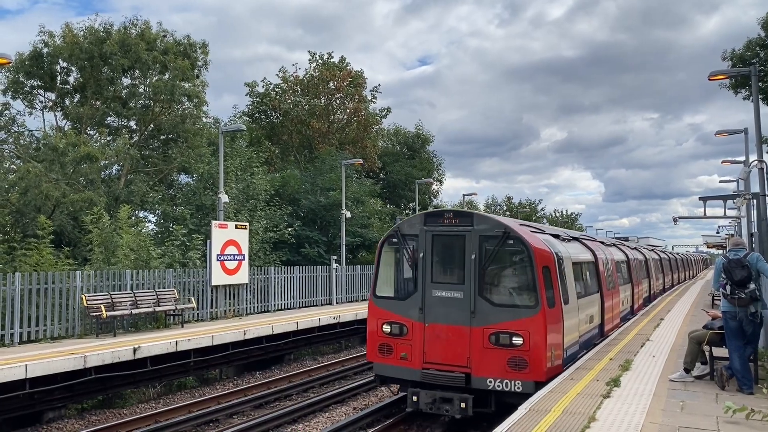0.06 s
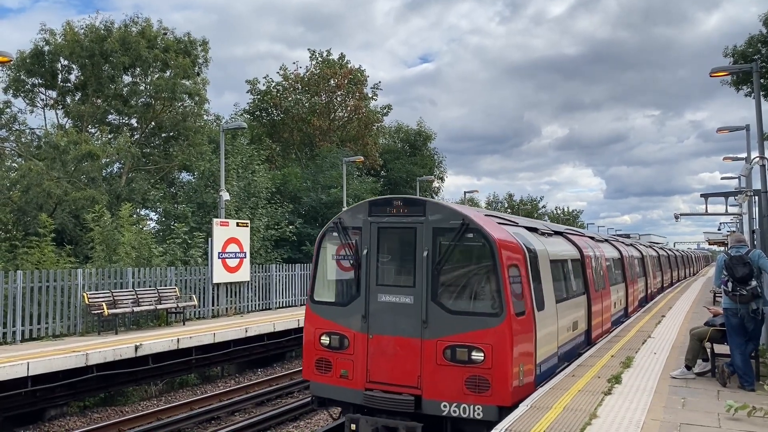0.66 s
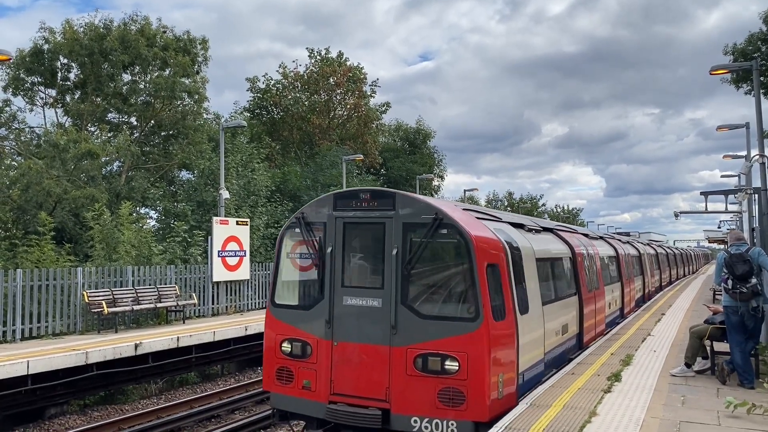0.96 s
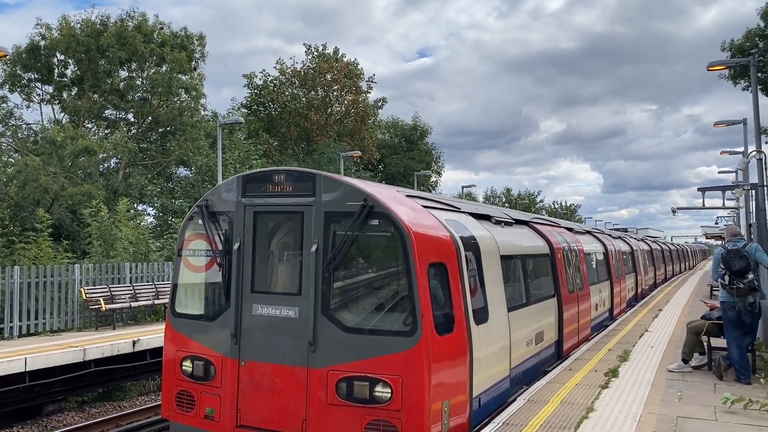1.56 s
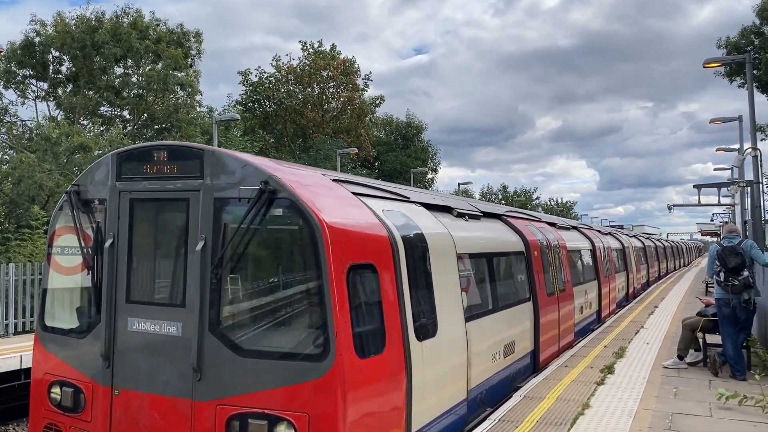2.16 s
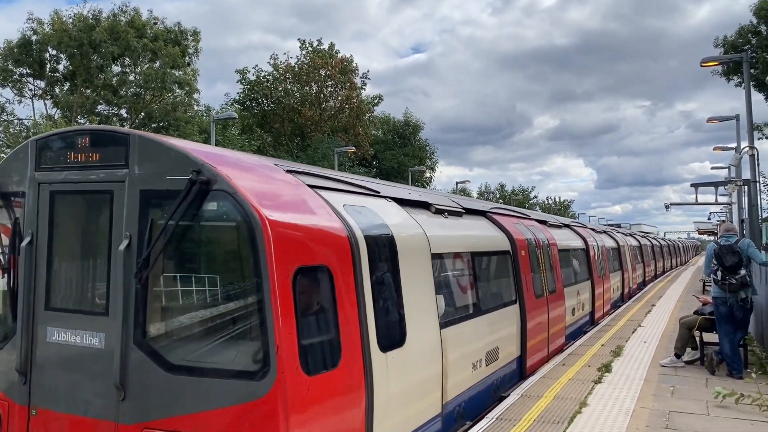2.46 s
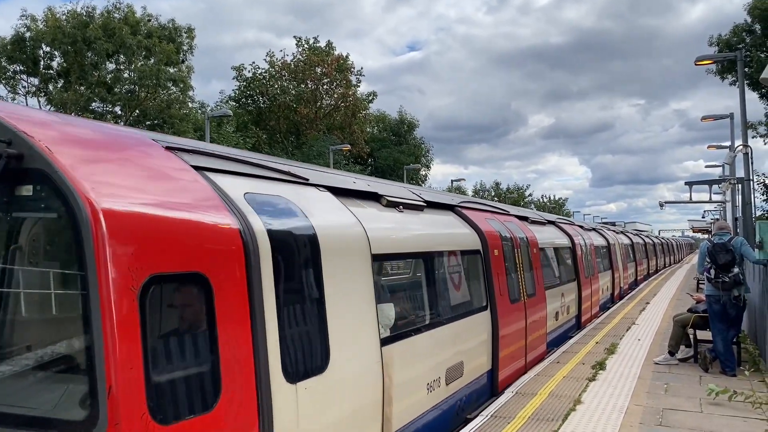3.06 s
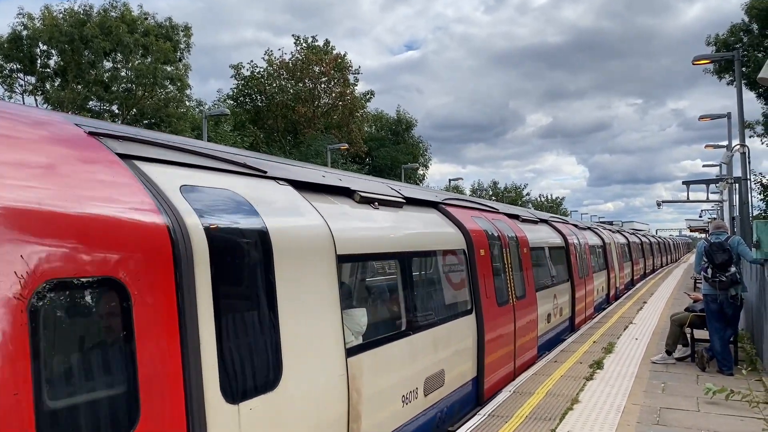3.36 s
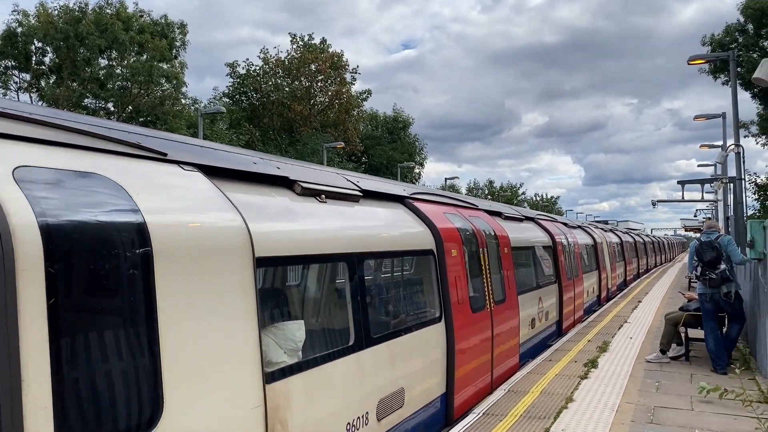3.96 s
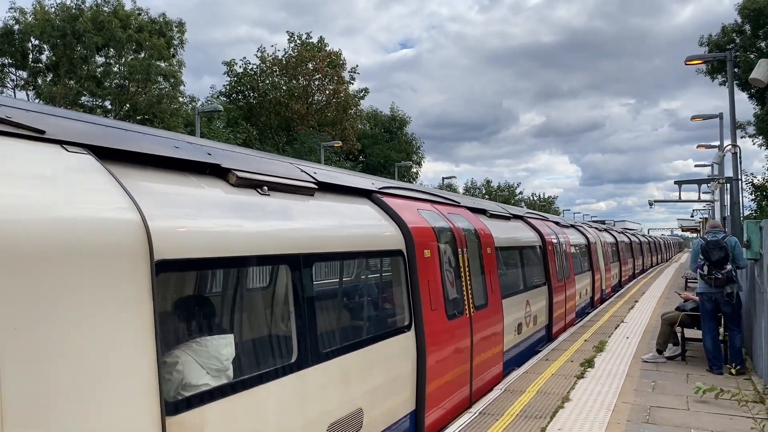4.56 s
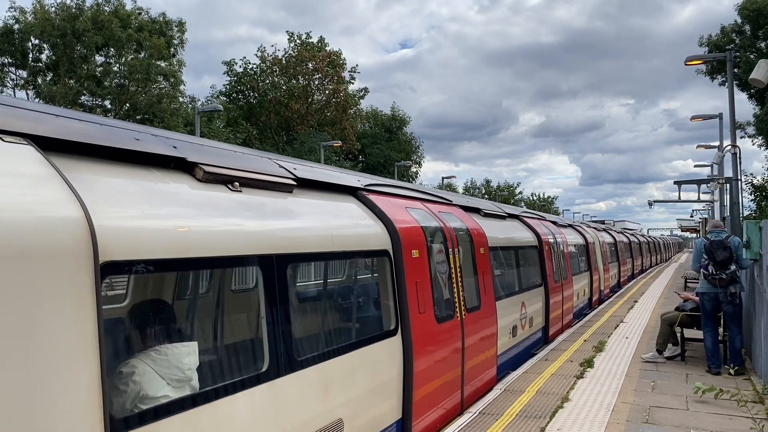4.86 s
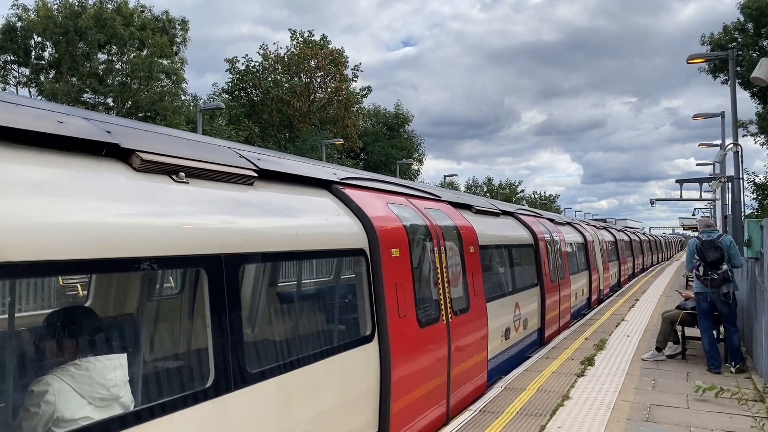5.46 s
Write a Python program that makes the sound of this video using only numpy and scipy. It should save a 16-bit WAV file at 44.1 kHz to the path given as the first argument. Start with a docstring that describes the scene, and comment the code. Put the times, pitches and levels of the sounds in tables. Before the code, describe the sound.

High, ringing brake squeals and a low rumble come from a slowing electric train, after a brief sinking motor whine.

```python
"""A falling whine over a low rumble: an electric train brakes to a stop beside an open platform.
The drive sings at multiples of its rotation rate, so its pitch sinks with the speed until it cuts out
after a second. The friction brakes take over, and stick-slip sets wheel after wheel squealing, each in
one of its modes; two loud notes from the nearest wheel come just before the stop. Underneath, the cars
rumble and knock over the rails, and their on-board equipment hums."""
import sys
import numpy as np
from scipy import signal
from scipy.fft import rfft, irfft, next_fast_len
from scipy.io import wavfile
from scipy.ndimage import uniform_filter1d, map_coordinates

SR = 44100
rng = np.random.default_rng(int(sys.argv[2]) if len(sys.argv) > 2 else 0)


def to_wav(sig):
    """Store sig (one row per channel, or 1-D mono) as 16-bit WAV at the path in sys.argv[1].

    Samples outside -1..1 are clipped; the rate is SR.
    """
    pcm = np.clip(np.atleast_2d(sig), -1, 1) * 32767
    pcm = np.round(pcm).astype(np.int16)
    wavfile.write(sys.argv[1], SR, pcm.T)  # frames by channels


N = 246959

# Noise spectra. Each row: frequency in Hz, relative spectral density in dB.
DRIVE_SPECTRUM = [(150, -14), (350, 3), (520, -12.5), (680, -2), (950, -6.5), (1550, -8.5), (2000, -6),
                  (2250, -15), (2750, -2), (3600, -15.5), (5000, -15.5), (8000, -29), (15000, -59)]
RUMBLE_SPECTRUM = [(20, -23), (35, -6), (52, 5), (85, 6), (110, 2), (135, -4), (220, -57)]
BODY_SPECTRUM = [(90, -40), (140, 2), (200, -0.5), (330, -2), (430, -4.5), (540, -20), (900, -63)]
HISS_SPECTRUM = [(300, -7.5), (520, -1.5), (900, -0.5), (1400, -7.5), (2200, -10), (3200, -7),
                 (4300, -13.5), (6500, -16), (8500, -29.5), (11500, -26.5), (13500, -26), (15000, -41)]
GRIND_SPECTRUM = [(3500, -13.5), (5000, 13.5), (6300, -14), (7400, -4), (9000, -24), (10400, 0),
                  (11500, 11.5), (12200, -12), (13100, 8.5), (14300, 6), (15500, -5)]
# Noise envelopes. Each row: time in seconds, level in dB.
DRIVE_ENVELOPE = [(0, -45.5), (.18, -43.5), (.35, -37.5), (.55, -40.5), (1.01, -43)]
RUMBLE_ENVELOPE = [(0, -44.5), (.9, -41.5), (1.25, -47), (1.6, -43.5), (2.1, -41), (2.7, -45.5),
                   (3.6, -43.5), (4.2, -43.5), (4.65, -40.5), (5.6, -44.5)]
GRIND_ENVELOPE = [(.15, -68), (.35, -53.5), (1.5, -49.5), (2.5, -55), (3, -71), (4.6, -73), (4.8, -62),
                  (5.6, -54)]
# Rolling noise. Each row: time in seconds, car body level in dB, hiss level in dB.
ROLLING_ENVELOPES = [(0, -42.5, -48), (1.1, -47, -48.5), (1.6, -46.5, -48.5), (2.2, -45, -48),
                     (2.7, -46, -49), (3.3, -47.5, -49.5), (4.2, -45.5, -51), (4.9, -46.5, -51),
                     (5.2, -49, -53), (5.6, -48, -50.5)]
# Likeness of the noise at left and right. Each row: frequency in Hz, correlation.
COHERENCE = [(60, .84), (250, .78), (600, .4), (1200, .25), (2200, .45), (5000, .3)]
# The drive's strong orders. Each row: multiple of the fundamental, level in dB.
STRONG_ORDERS = [(3, -48.5), (4, -50.5), (7, -46), (10, -57.5), (11, -56), (14, -53)]
# Its weak orders. Each row: multiple of the fundamental, level in dB relative to DRIVE_ENVELOPE.
WEAK_ORDERS = [(6, -16), (9, -23), (17, -17), (21, -13.5), (25.3, -11.5), (27.4, -10.5), (28.7, -7.5)]
# Housing resonances that lift or sink a passing order. Each row: centre in Hz, half width in Hz, lift in dB.
HOUSING_RESONANCES = [(269, 2.5, 7), (281, 6, 5), (293, 3, 7), (302, 6.5, 12), (315.5, 2.8, 16),
                      (382, 11, 12), (634, 15, 15), (655, 7, 9), (672, 5, -6), (698, 11, 4.5),
                      (902, 17, 13), (1019, 19, 8.5), (1255, 20, 7), (1361, 21, 10), (1424, 17, 12)]
# Passing equipment. Each row: pitch in Hz, peak level in dB, time when nearest in seconds,
# half passing time in seconds.
EQUIPMENT_HUMS = [(339, -57.5, 4.8, 1.1), (770, -64, 4.3, 1.1), (903, -59, 2.3, 1), (1100, -65, 4.7, .96),
                  (1207, -57.8, 4.55, .9)]
# Squeals of rolling wheels, a far car and near wheels at a crawl. Each row: start, rise, hold and fall
# in seconds, pitch and bend in Hz, level and its drift in dB, diffuse share of the power,
# left over right in dB, relative level of the octave in dB, Doppler spread in Hz.
ROLLING_WHEELS = [ (.1, .26, .08, .39, 5302, 218.5, -23.5, 0.5, 0.5, 6.5, -18, 40),
                  (0.055, 0.12, .5, .15, 6625, 81, -43, 5, 0.62, 0.5, -16, 55),
                  (.24, .12, .06, .45, 6275, 106, -35.5, -1.5, 0.73, 2, -13, 50),
                  (.48, 0.067, 0.03, .1, 5870, 0, -37.5, 2, .65, 5, -23, 39),
                  (.7, .07, 1.69, .1, 5627, -8, -26.8, -.5, .33, 4, -16, 42),
                  (1.4, .05, .08, .08, 5612, 0, -26, 0, .2, 4, -22, 30),
                  (2.46, .07, .16, .05, 5618, 0, -27, 1, .25, 4, -21, 30),
                  (2.738, .012, .03, .3, 5615, 60, -27.5, 0, .25, 4, -20, 30),
                  (.7, .08, .47, .42, 5845, -49.5, -29.3, -1, .72, 4, -16, 55),
                  (1.5, .07, 0.027, .17, 5680, 142, -26.5, -4, 0.6, 1, -32, 33),
                  (1.72, .08, 0.49, .25, 5836, -17, -34, 6, 0.75, 9, -32, 23),
                  (2.92, .08, .03, .33, 5745, 60, -43, -10, .5, 8, -30, 40),
                  (.72, .11, 1.85, .27, 6700, 8, -30.5, 0.5, 0.48, 0.5, -16.5, 50),
                  (1.66, .06, .03, .09, 6700, 0, -25.5, 0, .15, 1, -26, 25),
                  (0.83, 0.12, .7, 0.23, 7130, 40, -47, -2, 0.8, -2, -5, 60),
                  (1.05, 0.26, 1, .5, 7250, -88, -49.5, -2, .7, -2, 2, 76),
                  (.74, .06, .15, .4, 5005, 0, -46, 0, .6, 4, -22, 45),
                  (1.33, .1, 0.17, 0.3, 4590, 90, -39.5, 0, 0.63, 4.5, -26, 44),
                  (2.05, .12, .65, .3, 4644, 0, -43.5, 1, .75, 4, -28, 37),
                  (1.33, .2, .02, 0.19, 10200, 80, -48.5, 1, 0.86, 2, -30, 47),
                  (.25, .08, 2.1, .35, 12540, -250, -48.5, -5, .9, 0, -30, 90)]
FAR_WHEELS = [ (.75, 0.2, 0.54, 0.79, 6900, -3, -42, -6, 0.51, -1, -20, 65),
              (2.2, 0.24, 0.27, 0.28, 7000, 2, -51, -4, .6, -1, -20, 55),
              (2.65, 0.26, 0.35, .18, 6840, 152.5, -46.5, 3, 0.61, -1, -15, 54.5),
              (3.3, .15, .3, .15, 6820, 100.5, -44, 1, 0.71, -.83, -15.5, 55.5),
              (3.7, .15, .55, .2, 6870, 50.5, -42.5, -3.2, 0.59, -1, -16.5, 55.1),
              (4.351, 0.22, 0.4, .75, 6980, 40, -45, -5, 0.58, -0.8, -12, 55.7)]
CRAWLING_WHEELS = [ (5.37, .11, .18, .1, 5824, 1, -27.5, 2, .1, 10, -21, 16),
                   (5.38, .06, .2, .1, 5588, -20, -34, -4, .2, 6.6, -22, 16)]
# Jolts of the running gear. Each row: start in seconds, level in dB, centre in Hz, 60 dB decay in seconds.
GEAR_JOLTS = [(.6, -32.5, 77.5, 0.43), (.82, -30, 85, 0.4), (1.552, -39.5, 320, 0.29),
              (1.63, -30, 58, 0.17), (2.03, -28.5, 66.5, 0.17), (2.621, -35, 756, 0.099),
              (3.9, -36, 85, 0.24), (4.098, -39.5, 302, 0.22), (4.14, -36.5, 404, 0.13),
              (4.23, -35, 80, 0.27), (5.03, -30.5, 82, .25)]
# Flares of a biting overtone. Each row: peak time in seconds, half length in seconds, level in dB.
OVERTONE_FLARES = [(.86, .08, -51), (1.16, .09, -46), (1.38, .07, -47), (1.47, .04, -47), (1.58, .05, -52),
                   (1.77, .1, -53), (1.94, .05, -55), (2.175, .08, -40), (2.27, .05, -45), (2.43, .12, -52)]
# Single brake blocks. Each row: peak time, rise and fall in seconds, pitch and bend in Hz, level in dB.
BLOCK_SQUEAKS = [ (1.17, 0.091, 0.1, 2810, -2, -51.5), (1.41, 0.14, 0.18, 2787, 56, -45.5),
                 (1.56, 0.096, .18, 4606, -5, -26.5), (1.789, 0.1, 0.19, 2794, -46, -39.5),
                 (1.869, 0.1, 0.25, 4550, -37, -42.5), (2.42, 0.097, 0.16, 2820, 0, -49.5),
                 (2.58, 0.11, 0.1, 4870, 0, -44), (2.58, 0.084, 0.18, 5030, 0, -45),
                 (2.8, 0.12, 0.19, 5040, 0, -46), (2.9, 0.19, 0.25, 3330, -62, -47),
                 (3.05, 0.36, 0.28, 3144, -2, -49), (3.18, .08, .12, 3105, 0, -40),
                 (3.255, .02, 0.16, 3094, 0, -45), (3.33, 0.039, 0.14, 3140, 0, -48),
                 (3.015, 0.052, 0.29, 4100, 2, -40.5), (3.1, .025, .09, 4084, -2, -31.5),
                 (3.15, 0.029, .15, 4090, 2, -33), (3.32, .08, 0.14, 4140, 70, -49),
                 (3.745, 0.047, .12, 3460, 0, -43), (3.795, 0.0303, .07, 3440, 0, -35.5),
                 (3.835, .025, .06, 3440, 0, -44), (3.89, .05, .22, 3440, 0, -55),
                 (4.695, .035, 0.18, 4540, 0, -33), (4.95, 0.087, .15, 2990, 5, -47),
                 (5.029, 0.22, 0.48, 6730, 31, -52), (5.13, 0.15, 0.37, 7220, 2, -51),
                 (5.15, 0.23, 0.69, 3210, 0, -58.5), (5.275, 0.057, .14, 4590, 8, -29),
                 (5.6, 0.22, 0.088, 7150, 2, -47.5)]
# The nearest wheel's two notes. Each row: time in seconds, pitch in Hz, level in dB.
UPPER_MODE = [(4.6, 5860, -71), (4.66, 5660, -36), (4.73, 5610, -32), (4.77, 5635, -39.5),
              (4.81, 5640, -22), (4.89, 5612, -25), (4.975, 5616, -23.5), (5.03, 5614, -26),
              (5.14, 5614, -24), (5.26, 5614, -25.5), (5.34, 5646, -22.5), (5.4, 5690, -25.5),
              (5.47, 5790, -40), (5.52, 5720, -80)]
LOWER_MODE = [(4.65, 4530, -73), (4.7, 4450, -34), (4.8, 4435, -24.5), (4.87, 4452, -27.5),
              (4.96, 4473, -24.7), (5.07, 4480, -24), (5.18, 4510, -26), (5.24, 4557, -27.5),
              (5.33, 4604, -38), (5.47, 4600, -70)]
# Three swells an octave under the lower note. Each row: time in seconds, level in dB.
SUBHARMONIC = [(4.82, -75), (4.875, -43), (4.905, -39.5), (4.945, -51), (4.99, -45), (5.08, -50),
               (5.14, -38.5), (5.2, -45), (5.25, -57), (5.35, -70)]
# Phase between the stereo channels. Each row: frequency in Hz, lead of the left side in radians.
LEFT_LEAD = [(1500, 0), (3000, .5), (4470, 1.7), (5600, 3.9), (5850, 4), (6250, 6.2), (7600, 6.3),
             (8500, 9.3), (9400, 9.5), (10000, 12.5), (11900, 12.5), (12800, 15.6), (16000, 15.7)]

TOP_HZ = 15750  # band limit
TIME = np.arange(N) / SR


def amp(db):
    """Amplitude ratio of a level in decibels."""
    return 10 ** (np.asarray(db) / 20)


def unit(x):
    """The signal normalised to rms 1."""
    return x / np.sqrt(np.mean(np.abs(x) ** 2) + 1e-20)


def along(points, hz):
    """Interpolation of (Hz, value) points on a logarithmic frequency axis."""
    freqs, values = np.transpose(points)
    return np.interp(np.log(hz + 1), np.log(freqs + 1), values)


def curves(rows):
    """Linear interpolation in time: one value per sample for each column after the first."""
    times, *columns = np.transpose(rows)
    return [np.interp(TIME, times, column) for column in columns]


def wobble(rate, size=N):
    """Smooth random modulation with rate knots a second."""
    knots = rng.standard_normal(int(size * rate / SR) + 4)
    return map_coordinates(knots, [np.arange(size) * rate / SR])


def filtered(x, response):
    """Linear filtering: the spectrum is multiplied by a frequency response."""
    size = next_fast_len(N + 8192)
    return irfft(rfft(x, size) * response(np.fft.rfftfreq(size, 1 / SR)), size)[..., :N]


def rush(spectrum, patchy_db):
    """Partially coherent stereo noise, its gain varying in random patches of time and frequency."""
    bins = signal.stft(rng.standard_normal((2, N)), nperseg=512)[2]
    patches = uniform_filter1d(rng.standard_normal(bins.shape[1:]), size=5, axis=0)
    patches = uniform_filter1d(patches, size=14, axis=1)
    pair = signal.istft(bins * amp(patchy_db * unit(patches)), nperseg=512)[1][:, :N]
    angle = lambda hz: np.arccos(np.clip(along(COHERENCE, hz), -1, 1)) / 2
    mid, side = filtered(pair, lambda f: amp(along(spectrum, f)) * [np.cos(angle(f)), np.sin(angle(f))])
    return np.array([mid + side, mid - side]) / np.std(mid)


def scatter(width_hz, size, step=8):
    """Multipath fading: many Doppler-shifted reflections sum to one complex gain per ear."""
    count = next_fast_len(size // step + 512)
    shift_hz = np.fft.fftfreq(count, step / SR)
    reflections = rng.standard_normal((2, count)) + 1j * rng.standard_normal((2, count))
    fading = np.fft.ifft(reflections * np.exp(-np.abs(shift_hz) / width_hz))
    return np.array([np.interp(np.arange(size) / step, np.arange(count), unit(ear)) for ear in fading])


def tone(hz, width_hz, wet, echo=0):
    """Superposition of a direct tone, one wall echo and diffuse reflections; wet and echo share power."""
    # the echo path shortens more slowly than the direct one, so it arrives a little flat and beats
    lag_cycles = np.cumsum(width_hz * (1 + 0.2434 * wobble(9, len(hz)))) / SR
    wall = np.exp(-2j * np.pi * (lag_cycles + rng.random()))
    steady = np.sqrt(1 - echo) + np.sqrt(echo) * wall
    paths = np.sqrt(1 - wet) * steady + np.sqrt(wet) * scatter(width_hz, len(hz))
    return np.sqrt(2) * np.real(paths * np.exp(2j * np.pi * np.cumsum(hz) / SR))


def drive(start_hz=105.6, slowing_hz_per_s=15.8, cut_s=1.026):
    """Forced vibration: motor and gear orders sweep through resonances until the electric brake lets go."""
    hz = start_hz - slowing_hz_per_s * TIME
    since_cut = np.maximum(TIME - cut_s, 0)
    effort = amp(-8 * np.minimum(since_cut / 0.032, 1) - 60 * since_cut)  # a quick drop, then a tail
    whine = 0
    for order, db in STRONG_ORDERS:
        lift_db = sum(peak_db * np.exp(-((order * hz - centre) / width) ** 2)
                      for centre, width, peak_db in HOUSING_RESONANCES)
        gain = amp(db + effort * lift_db + 1.8 * wobble(14))
        whine += gain * tone(order * hz, width_hz=22, wet=.33)
    weak = sum(amp(db) * tone(order * hz, width_hz=18, wet=.59) for order, db in WEAK_ORDERS)
    noise = amp(1.5) * rush(DRIVE_SPECTRUM, patchy_db=3.5)
    sound = whine + amp(curves(DRIVE_ENVELOPE)[0]) * (weak + noise)
    return effort * sound * amp([[1], [-1]])


def rolling():
    """Rolling contact excites broadband noise: the cars rumble in uneven lumps and the wheels hiss."""
    body_db, hiss_db = curves(ROLLING_ENVELOPES)
    rumble = amp(curves(RUMBLE_ENVELOPE)[0] + 1.8 * wobble(12)) * rush(RUMBLE_SPECTRUM, patchy_db=0)
    body = amp(body_db) * rush(BODY_SPECTRUM, patchy_db=1)
    hiss = amp(hiss_db) * rush(HISS_SPECTRUM, patchy_db=2)
    return rumble + body + hiss * amp([[.8], [-.8]])


def equipment_hum():
    """Spherical spreading: each hum under the floor varies inversely with distance as it passes."""
    out = np.zeros((2, N))
    for hz, db, nearest, passing in EQUIPMENT_HUMS:
        distance = np.hypot(1, (TIME - nearest) / passing)
        out += amp(db) / distance * tone(np.full(N, hz), width_hz=12, wet=.2)
    return out


def wheel(hz, grip_db, width_hz, wet, echo, pan_db, octave_db):
    """Nonlinear vibration of a wheel: one trembling mode, a fringe of rubbing noise, and harmonics."""
    hz = hz * (1 + .0005 * wobble(60.9, len(hz)))
    mode = tone(hz, width_hz, wet, echo)
    rubbing = amp(-29) * tone(hz, width_hz=190, wet=.92)
    sound = (mode + rubbing) * amp([[pan_db / 2], [-pan_db / 2]])
    # a harder grip distorts the vibration more, so the harmonics swell faster than the fundamental
    for k, harmonic_db in [(2, octave_db), (3, octave_db - 7)]:
        if k * hz.mean() < TOP_HZ:
            gain = amp(harmonic_db + grip_db + 2 * wobble(13, len(hz)))
            sound += gain * tone(k * hz, k * width_hz, np.sqrt(wet), echo)
    return sound * amp(grip_db)


def squeal(row, flutter_db, wander, echo, rise_power=0.86, fall_power=1.16):
    """Self-excited oscillation: stick-slip locks a wheel into one mode, which bends as the grip lets go."""
    start, rise, hold, fall, pitch, bend, db, drift_db, wet, pan_db, octave_db, width_hz = row
    age = TIME - start
    build_up = np.clip(age / rise, 0, 1) ** rise_power
    release = np.clip((rise + hold + fall - age) / fall, 0, 1) ** fall_power
    envelope = build_up * release
    on = envelope > 0
    size = on.sum()
    progress = np.linspace(0, 1, size)
    hz = (pitch + bend * progress ** 2.6) * (1 + wander * wobble(9, size))
    grip_db = flutter_db * wobble(24, size)
    out = np.zeros((2, N))
    out[:, on] = wheel(hz, grip_db, width_hz, wet, echo, pan_db, octave_db) * amp(db + drift_db * progress)
    return out * envelope


def friction_brakes():
    """Sliding friction: the blocks grind while many wheels ring at once and beat with one another."""
    squeals = sum(squeal(row, flutter_db=1.9, wander=.0021, echo=.12) for row in ROLLING_WHEELS)
    grinding = rush(GRIND_SPECTRUM, patchy_db=2) * amp(1.5 * wobble(14))
    return squeals + amp(curves(GRIND_ENVELOPE)[0]) * grinding


def knocks(quality=2.7, attack_s=0.0029):
    """Damped resonance: each jolt of the running gear excites a noise band that decays exponentially."""
    out = np.zeros(N)
    for start, db, centre, t60 in GEAR_JOLTS:
        age = np.maximum(TIME - start, 0)
        resonance = lambda f: 1 / (1 + (quality * (f / centre - centre / (f + 1))) ** 2) ** 0.92
        ring = unit(filtered(rng.standard_normal(N), resonance))
        out += ring * amp(db - 60 * age / t60) * (1 - np.exp(-age / attack_s))
    return out


def far_car():
    """Stick-slip keeps a far car singing faintly, most of its notes creeping upward."""
    return sum(squeal(row, flutter_db=1.5, wander=.001, echo=.1) for row in FAR_WHEELS)


def flares(hz=8425, wet=.2, width_hz=25):
    """Friction excites an overtone in short, uneven flares, half as high again as the main squeal."""
    rows = [(peak - half, half, 0, half, hz, 0, db, 0, wet, 0, 0, width_hz)
            for peak, half, db in OVERTONE_FLARES]
    return sum(squeal(row, flutter_db=2, wander=.002, echo=.1) for row in rows)


def block_squeaks(wet=.28, pan_db=5, octave_db=-21, width_hz=32):
    """Brief stick-slip at single blocks: each squeak builds to a peak and at once rings away."""
    out = np.zeros((2, N))
    for peak, rise, fall, pitch, bend, db in BLOCK_SQUEAKS:
        row = (peak - rise, rise, 0, fall, pitch, bend, db, 0, wet, pan_db, octave_db, width_hz)
        out += squeal(row, flutter_db=1.5, wander=.001, echo=.06, rise_power=1.44, fall_power=2.84)
    return out


def nearest_wheel(beat_peak_s=4.958, beat_hz=11, slowing_hz_per_s=11, reflection_gain=.7):
    """Two modes ring; interference with its reflection makes the lower pulse, slowing with the train."""
    def note(table, hz, db, grip_db, **colour):
        """One mode follows its pitch and level for as long as its table lasts."""
        on = (TIME > table[0][0]) & (TIME < table[-1][0])
        out = np.zeros((2, N))
        out[:, on] = amp(db[on]) * wheel(hz[on], grip_db[on], width_hz=20, wet=.12, echo=.02, **colour)
        return out
    age = TIME - beat_peak_s
    beat = np.exp(2j * np.pi * age * (beat_hz - slowing_hz_per_s * age / 2))
    swell_db = 20 * np.log10(np.abs(1 + reflection_gain * beat))
    even_grip = np.zeros(N)
    lower_hz, lower_db = curves(LOWER_MODE)
    upper = note(UPPER_MODE, *curves(UPPER_MODE), even_grip, pan_db=8, octave_db=-25)
    lower = note(LOWER_MODE, lower_hz, lower_db, swell_db, pan_db=2, octave_db=-38)
    sub = note(SUBHARMONIC, lower_hz / 2, curves(SUBHARMONIC)[0], even_grip, pan_db=3.5, octave_db=-37)
    return upper + lower + sub


def crawling_wheels():
    """Stick-slip at a crawl: near wheels add two last, almost pure notes, mostly direct sound."""
    return sum(squeal(row, flutter_db=1.5, wander=.0005, echo=.06) for row in CRAWLING_WHEELS)


def scene():
    """Superposition of all the train's sources, heard from the platform."""
    braking = drive() + friction_brakes() + flares() + far_car() + block_squeaks()
    stopping = crawling_wheels() + nearest_wheel()
    return braking + stopping + rolling() + equipment_hum() + knocks()


def record(dry):
    """Stereo image: above about 8 kHz both sides carry nearly the same treble, left leading in phase,
    with nothing above 15.75 kHz."""
    crossover_hz, shared_power = (7000, 8200), .97
    angle = lambda hz: np.interp(hz, crossover_hz, [0, np.arcsin(np.sqrt(shared_power))])
    left, right = dry
    right = filtered(right, lambda hz: np.cos(angle(hz))) + filtered(left, lambda hz: np.sin(angle(hz)))
    phase_shift = lambda hz: np.exp(.5j * along(LEFT_LEAD, hz) * np.array([[1], [-1]]))
    return filtered(np.array([left, right]), lambda hz: phase_shift(hz) * (hz < TOP_HZ))


dry = scene()
out = record(dry)
to_wav(out)
```